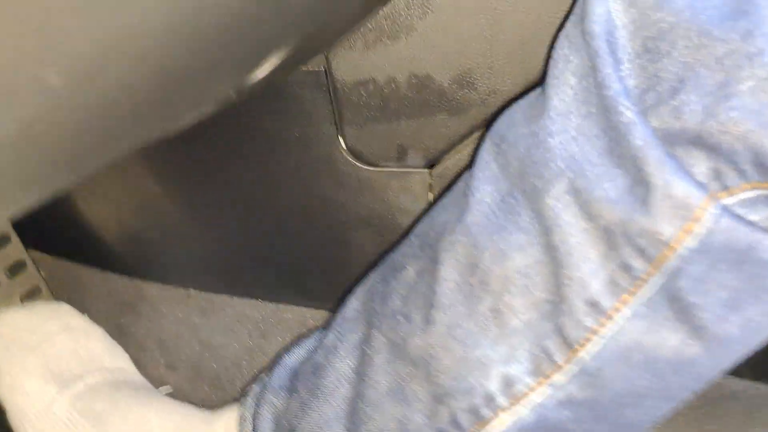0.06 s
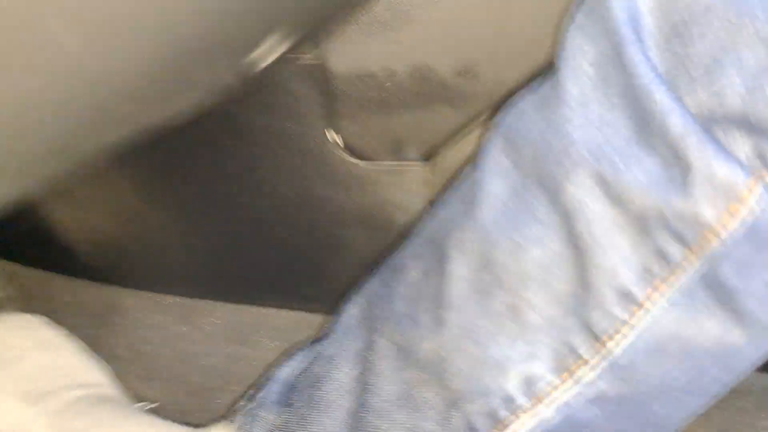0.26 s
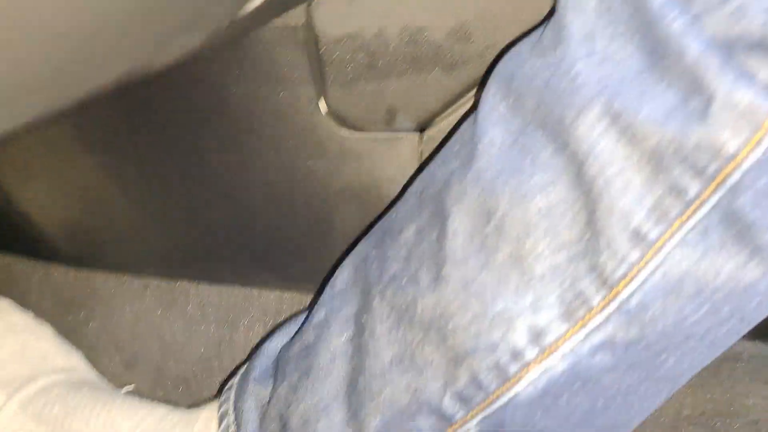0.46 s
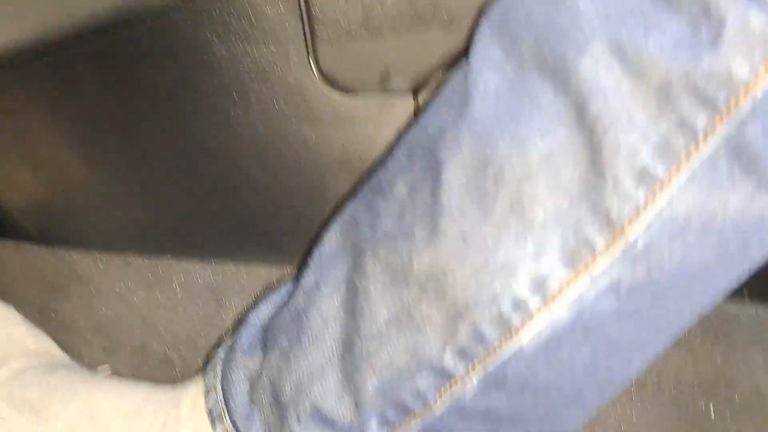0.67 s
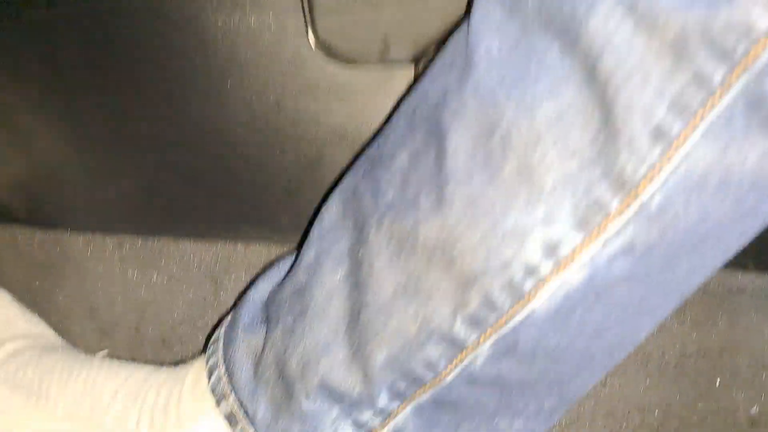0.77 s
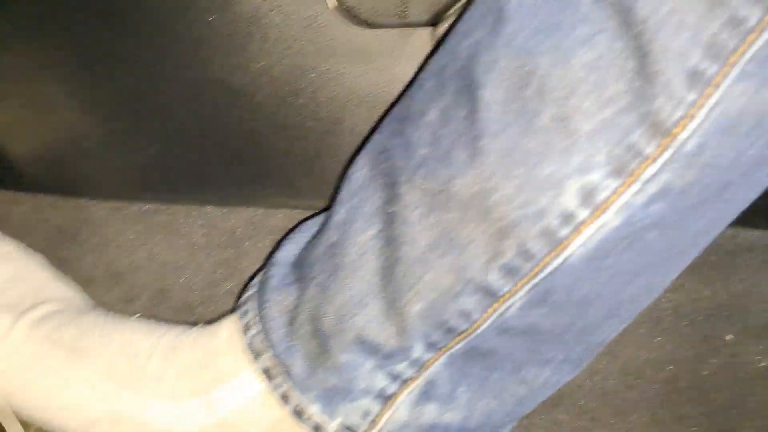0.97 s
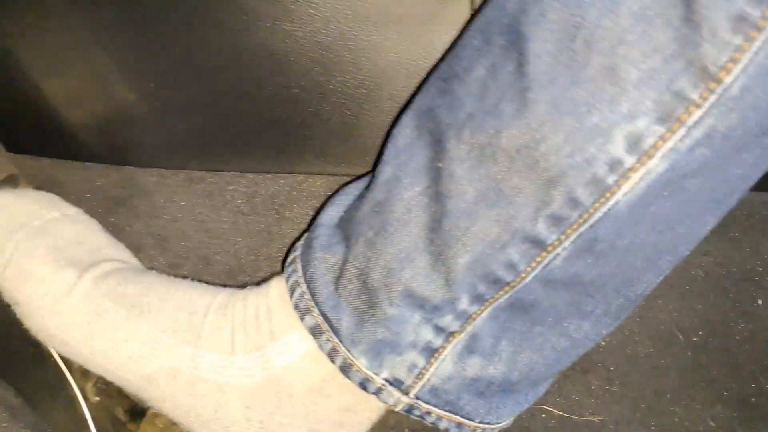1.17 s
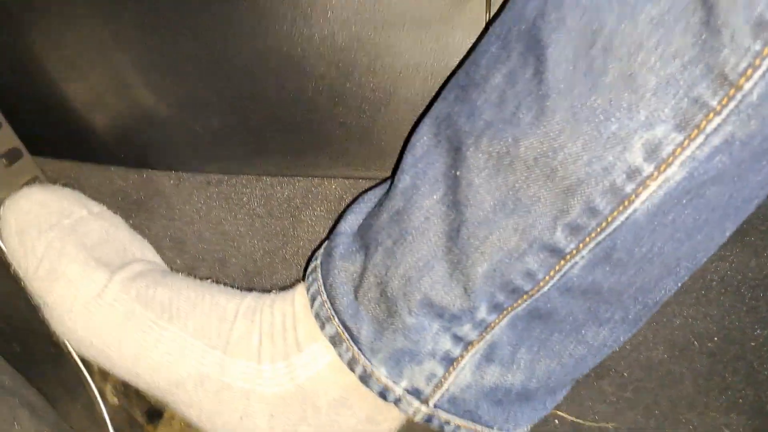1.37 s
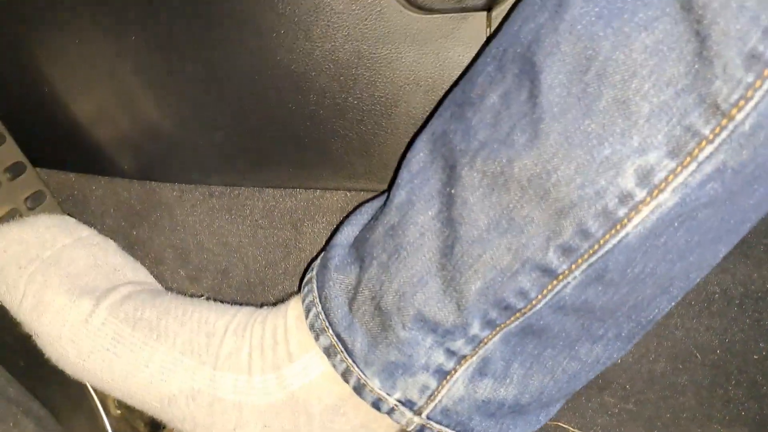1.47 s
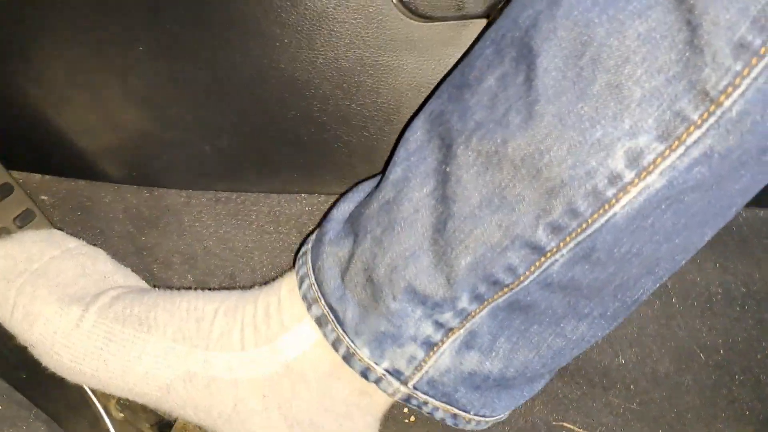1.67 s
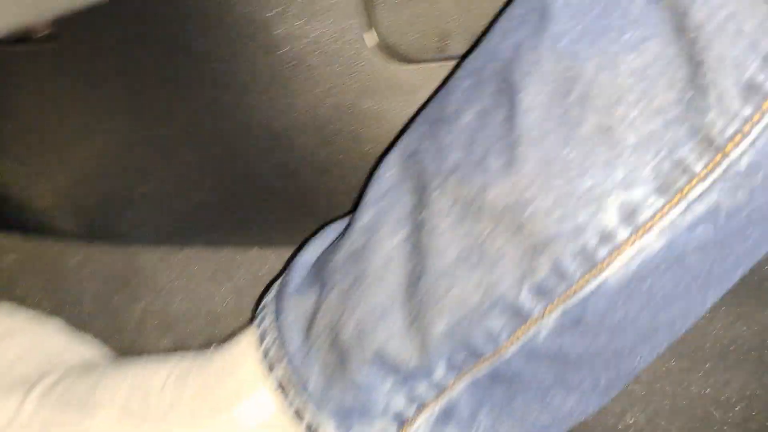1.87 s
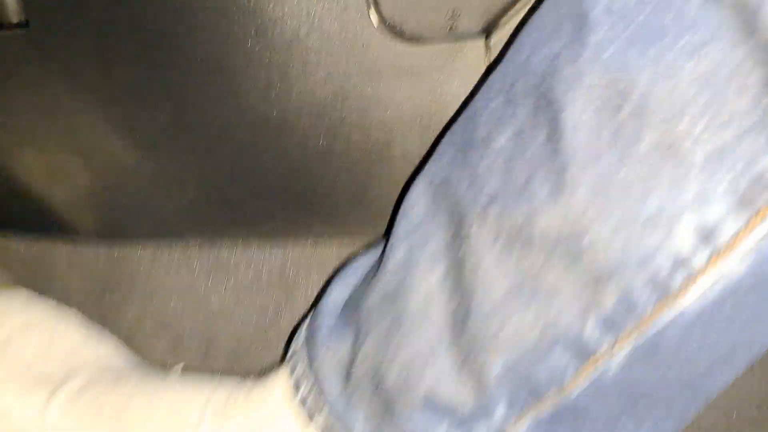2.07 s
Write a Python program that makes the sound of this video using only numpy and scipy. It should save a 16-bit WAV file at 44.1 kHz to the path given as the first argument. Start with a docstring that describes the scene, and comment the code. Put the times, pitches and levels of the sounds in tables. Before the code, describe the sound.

Camera handling noise: one booming knock, then skin rubbing with soft bumps and ticks.

```python
"""Inside a nearly silent car, by the pedals: a hand shifts on the casing of a hand-held camera.
A hard knock with a short scrape sets the casing booming. Skin slides past the microphone ports,
sticks and slips twice, then five times in a row, clicks off, and slides again among soft bumps
and light taps. The rubbing is grainy noise; the blows are short pulses and damped modes."""
import sys
import numpy as np
from scipy import signal
from scipy.fft import rfft, irfft, next_fast_len
from scipy.io import wavfile
from scipy.ndimage import map_coordinates

SR = 44100
rng = np.random.default_rng(int(sys.argv[2]) if len(sys.argv) > 2 else 0)


def file_out(sig):
    """Save sig as 16-bit WAV at sys.argv[1]."""
    # one column per channel
    cols = np.atleast_2d(sig).T
    # limit, then scale
    lim = np.clip(cols, -1, 1)
    pcm = np.round(lim * 32767).astype(np.int16)
    wavfile.write(sys.argv[1], SR, pcm)


N = 92610

# Treble spectrum of rubbing skin. Each row: frequency in Hz, relative density in dB.
SKIN_TREBLE = [(900, -2), (1800, -2), (2600, -3.5), (3700, 0), (5000, -1), (6700, 0), (7600, -17.5),
               (10000, -14), (14000, -30)]
GRIT_GRAIN_DB, SKIN_GRAIN_DB = 3, 0.93
TICK_ATTACK_S, TICK_LEFT_DB = 0.00031, -9


def amp(db):
    """Decibels to gain."""
    return 10 ** (np.asarray(db) / 20)


def unit(x):
    """Scale to rms 1."""
    return x / np.sqrt(np.mean(x ** 2) + 1e-20)


def clock():
    """Sample times in seconds."""
    return np.arange(N) / SR


def wobble(rate_hz):
    """Smooth random curve, rate_hz knots a second."""
    return map_coordinates(rng.standard_normal(int(N * rate_hz / SR) + 4), [clock() * rate_hz])


def filtered(x, response):
    """Apply a complex frequency response to x."""
    n = x.shape[-1]
    n_fft = next_fast_len(n + SR // 10, real=True)
    return irfft(rfft(x, n_fft) * response(np.fft.rfftfreq(n_fft, 1 / SR)), n_fft)[..., :n]


def placed(x, start_s):
    """Set a short sound at its time in the scene."""
    out = np.zeros(x.shape[:-1] + (N + SR,))
    out[..., round(start_s * SR):][..., :x.shape[-1]] = x
    return out[..., :N]


def noise(spectrum, grain_db=0):
    """Noise of rms 1 shaped by (Hz, dB) rows; grain_db clumps it into millisecond grains."""
    hz, db = np.transpose(spectrum)
    grains = rng.standard_normal(N) * amp(grain_db * wobble(900))
    return unit(filtered(grains, lambda f: amp(np.interp(np.log(f + 1), np.log(hz), db))))


def wide_noise(spectrum):
    """Noise common to both ports plus a weaker part of each port's own."""
    return noise(spectrum) + 0.7 * np.array([noise(spectrum), noise(spectrum)])


def ring(start_s, modes, attack_s, scatter=0, sag=0):
    """Struck (Hz, dB, T60 s) modes, randomly detuned by scatter; they start sharp by the share sag."""
    t = np.arange(int(min(2 * modes[0][2], 1) * SR)) / SR
    detunes = 1 + scatter * rng.standard_normal(len(modes))
    tones = 0
    for (hz, db, t60_s), detune in zip(modes, detunes):
        fade = np.exp(-np.log(1000) * t / t60_s)
        pitch_hz = hz * detune * (1 + sag * fade)
        tones = tones + amp(db) * fade * np.sin(2 * np.pi * np.cumsum(pitch_hz) / SR)
    return placed(tones * (1 - np.exp(-t / attack_s)), start_s)


def far_port(x, gain_db, lag_s=0.00046):
    """A contact on the right reaches the left port later and weaker."""
    return amp(gain_db) * filtered(x, lambda f: np.exp(-2j * np.pi * f * lag_s))


def cabin(level_db=-64):
    """Faint hush of the closed car."""
    # Each row: frequency in Hz, relative density in dB.
    hush_spectrum = [(25, -14), (45, 7.5), (90, 15), (200, -27), (450, -30), (1050, -9.5), (1600, -18),
                     (6000, -22), (8000, -34), (16000, -29)]
    return amp(level_db) * unit(wide_noise(hush_spectrum))


def slide():
    """Skin rubs the casing, mostly by the right port; the grip's rumble follows the left rub."""
    # Each row: time in seconds, then levels in dB of grit, treble, top hiss and left-port rub.
    rub_levels = [(0.02, -77, -67, -86, -70), (0.09, -72, -62.5, -73, -62), (0.2, -79, -61.5, -87, -57),
                  (0.28, -60, -62.5, -64, -55.5), (0.37, -66, -52, -58, -56.5),
                  (0.46, -81, -51.5, -57, -57), (0.56, -72, -44.5, -45, -48.5),
                  (0.67, -50.5, -41.5, -42, -46), (0.8, -54, -42.5, -41, -53.5),
                  (0.92, -75, -45, -45.5, -54.5), (1.04, -47, -46.5, -48, -53),
                  (1.152, -41.5, -51, -56, -60), (1.2, -49.5, -53, -62.5, -54.5),
                  (1.278, -59.5, -57, -68, -69), (1.336, -42, -60.5, -70, -65), (1.359, -63, -71, -75, -70),
                  (1.41, -66, -66, -97, -82), (1.45, -71, -58, -74.5, -78),
                  (1.52, -63.5, -56.5, -67, -75.5), (1.6, -68, -61, -80, -64),
                  (1.726, -67, -71.5, -91, -70), (1.774, -54, -55.5, -68.5, -71),
                  (1.84, -64, -49.5, -51, -64), (1.91, -54, -48, -46, -58.5), (2.0, -58.5, -50, -50, -55.5)]
    # Spectra of the layers. Each row: frequency in Hz, relative density in dB.
    grit_spectrum = [(130, -32), (420, 0), (750, -0.5), (1050, 4.5), (1450, -4.5), (2100, -8.5),
                     (3000, -19), (6000, -35)]
    hiss_spectrum = [(5000, -17), (7500, -6), (9500, -9), (10800, 0), (12000, 3.5), (13700, -2),
                     (16000, -5.5)]
    left_spectrum = [(200, 0.5), (500, 13), (1100, 8.5), (2200, 9), (3200, 3.5), (6300, 3.5), (8000, -7),
                     (11500, -6), (14000, -15.5)]
    rumble_spectrum = [(20, -33), (30, -25), (42, 5.5), (75, 3), (140, -2.5), (260, -6.5), (400, -15.5),
                       (900, -40.5)]
    times_s, *columns = np.transpose(rub_levels)
    grit_db, treble_db, hiss_db, left_db = [np.interp(clock(), times_s, db) for db in columns]
    grit = amp(grit_db) * noise(grit_spectrum, GRIT_GRAIN_DB)
    treble = amp(treble_db) * noise(SKIN_TREBLE, SKIN_GRAIN_DB)
    hiss = amp(hiss_db) * noise(hiss_spectrum, SKIN_GRAIN_DB)
    left_rub = amp(left_db) * noise(left_spectrum, SKIN_GRAIN_DB)
    grip_db = -48 + 0.63 * (left_db - left_db.max())
    rumble = amp(grip_db) * wide_noise(rumble_spectrum)
    return np.array([far_port(grit, gain_db=-13) + left_rub, grit + treble + hiss]) + rumble


def bumps():
    """Soft contacts of the grip: a short thud sinking in pitch, then a low boom."""
    # Each row: start in seconds, thud gain in dB, boom gain in dB.
    contacts = [(0.071, -43, -30), (0.498, -36.5, -31), (0.6806, -23, -30.5), (1.134, -46, -30),
                (1.188, -38.5, -34), (1.5, -53.5, -37.5), (1.646, -32, -29), (1.7931, -25, -19.5),
                (1.9083, -25.5, -24), (2.011, -40.5, -39)]
    thud_mode, boom_mode = (207, 3.3, 0.042), (78, 2.5, 0.1)  # Hz, dB, T60 s
    boom_lag_s = 0.0047
    thud, boom = np.zeros((2, N))
    for start_s, thud_db, boom_db in contacts:
        thud += amp(thud_db) * ring(start_s, [thud_mode], attack_s=0.0011, scatter=0.034, sag=0.51)
        boom += amp(boom_db) * ring(start_s + boom_lag_s, [boom_mode], attack_s=0.012, scatter=0.032)
    return np.array([far_port(thud, gain_db=-8), thud]) + boom


def casing(f, top_hz=10800):
    """Response of the hollow casing to a push: resonances, a shallow dip and an upper edge."""
    # Each row: centre in Hz, width in Hz, gain in dB.
    resonances = [(214, 180, 6), (646, 460, 2.5), (1027, 340, 0), (3700, 1200, 1.5), (6000, 1200, 3.5)]

    def band(hz, width_hz):
        return 1j * f * width_hz / (hz ** 2 - f ** 2 + 1j * f * width_hz)

    hollow = sum(amp(db) * band(hz, width_hz) for hz, width_hz, db in resonances)
    dip = 1 - (1 - amp(-1.5)) * band(hz=1800, width_hz=520)
    return (1 + hollow) * dip / (1 + 1j * np.sqrt(2) * f / top_hz - (f / top_hz) ** 2)


def clicks():
    """Sharp contacts: one push, rounded by its softness and swinging back once, with a dull rattle."""
    # Each row: start in seconds, left and right levels in dB, high-pass and low-pass corners in Hz.
    contacts = [(0.2228, 1, -27, 308, 520), (0.2279, -36, -16, 900, 1210), (0.2304, -27, -16, 900, 1100),
                (0.2407, -45, -3.5, 1590, 815), (0.2423, -24.5, -36, 900, 706),
                (1.3117, -29.5, -5, 292, 2640)]
    rattle_db, rattle_t60_s, rattle_hz = -12.5, 0.038, 950
    t = np.arange(SR // 10) / SR
    out = np.zeros((2, N))
    for start_s, left_db, right_db, highpass_hz, lowpass_hz in contacts:
        burst = np.exp(-np.log(1000) * t / rattle_t60_s) * rng.standard_normal((2, len(t)))
        burst /= np.linalg.norm(burst[0])
        rattle = filtered(burst, lambda f: 1 / (1 + 1j * f / rattle_hz - (f / rattle_hz) ** 2))
        push = (t == 0) + amp(rattle_db) * rattle

        def contact(f):
            return 1j * f / (highpass_hz + 1j * f) / (1 + 1j * f / lowpass_hz) ** 2

        pulse = filtered(push, lambda f: casing(f) * contact(f))
        out += placed(amp([[left_db], [right_db]]) * pulse / np.abs(pulse).max(), start_s)
    return out


def knock():
    """A hard knock, mostly on the left: the casing booms, shuddering and sinking as it fades."""
    modes = [(63.5, -7.5, 0.31), (155, -37, 0.46)]  # Hz, dB, T60 s
    shudder_db, right_db = 2.3, -11.5
    boom = ring(start_s=0.2235, modes=modes, attack_s=0.0093, sag=0.12)
    boom *= amp(shudder_db * wobble(rate_hz=120))
    return np.array([boom, amp(right_db) * boom])


def stroke(start_s, hold_s, edge_s=0.0046):
    """Attack, hold and release of a short rub."""
    end_s = start_s + hold_s
    return np.interp(clock(), [start_s - edge_s, start_s, end_s, end_s + edge_s], [0, 1, 1, 0])


def scrape():
    """The knock scrapes across the left port, pressing harder until it breaks off."""
    # Each row: frequency in Hz, relative density in dB.
    spectrum = [(150, 11.5), (400, 0.5), (900, -7), (1400, -5), (3500, -11), (7000, -20.5), (12000, -28.5),
                (16000, -43)]
    start_s, hold_s, right_db = 0.2265, 0.0309, -29
    level_db = np.interp(clock(), [start_s, start_s + hold_s], [-24.5, -21])
    left = noise(spectrum, SKIN_GRAIN_DB)
    right = amp(right_db) * noise(spectrum, SKIN_GRAIN_DB)
    return amp(level_db) * stroke(start_s, hold_s) * np.array([left, right])


def brush(level_db=-44):
    """A light brush past the right port."""
    right = amp(level_db) * stroke(start_s=0.299, hold_s=0.021) * noise(SKIN_TREBLE, GRIT_GRAIN_DB)
    return np.array([np.zeros(N), right])


def slips():
    """Each release of the sticking skin gives a dull tick."""
    # Each row: start in seconds, gain in dB.
    releases = [(0.524, -31.5), (0.548, -32.5), (0.878, -23.5), (0.9071, -22.5), (0.9396, -21.5),
                (0.9743, -24.5), (1.0093, -19)]
    # Ring of one release. Each row: frequency in Hz, gain in dB, T60 in seconds.
    modes = [(296.5, -2, 0.023), (520, -0.5, 0.0084), (770, -2, 0.013), (1075, -2.5, 0.016),
             (1610, -20, 0.01)]
    right = sum(amp(db) * ring(start_s, modes, TICK_ATTACK_S, scatter=0.1) for start_s, db in releases)
    return np.array([far_port(right, TICK_LEFT_DB), right])


def taps(t60_s=0.0073):
    """Light taps on the casing, each with one brief woody ring."""
    # Each row: start in seconds, gain in dB, pitch in Hz.
    contacts = [(1.647, -29, 1410), (1.82, -28, 1170), (2.0459, -21, 950)]
    right = sum(ring(start_s, [(hz, db, t60_s)], TICK_ATTACK_S) for start_s, db, hz in contacts)
    return np.array([far_port(right, TICK_LEFT_DB), right])


def scene():
    """The handling sounds over the cabin's hush, as left and right."""
    return cabin() + slide() + bumps() + clicks() + knock() + scrape() + brush() + slips() + taps()


def record(dry):
    """The camera cuts the lowest bass, clips at full scale and drops the highest treble."""
    low_hz, top_hz = 29, 16100
    low_cut = signal.butter(4, low_hz, "highpass", fs=SR, output="sos")
    clipped = np.clip(signal.sosfilt(low_cut, dry), -1, 1)
    return filtered(clipped, lambda f: f < top_hz)


dry = scene()
out = record(dry)
file_out(out)
```